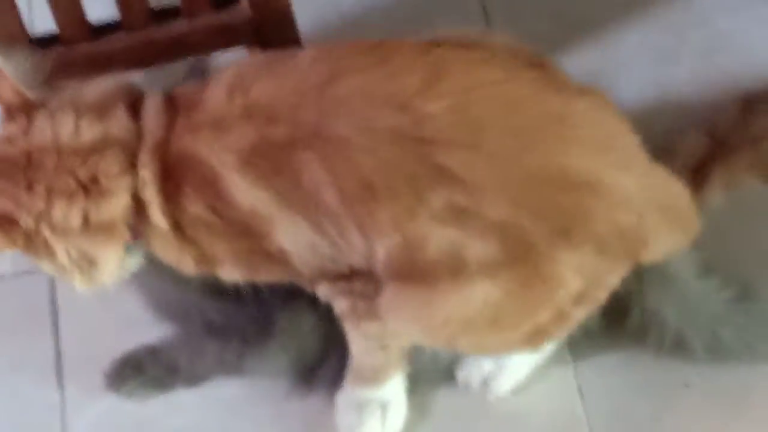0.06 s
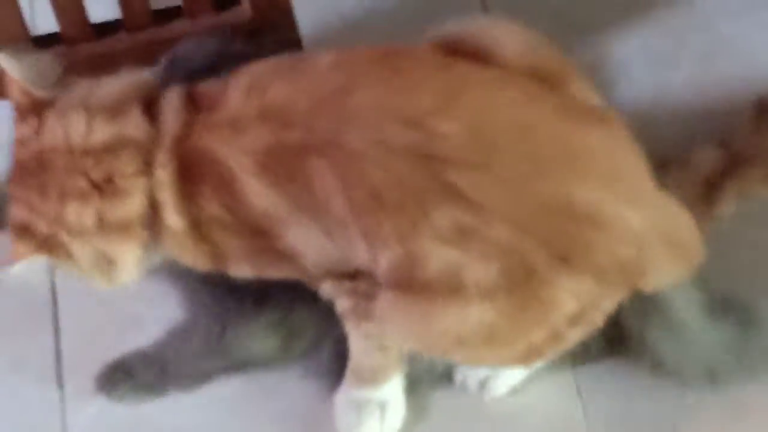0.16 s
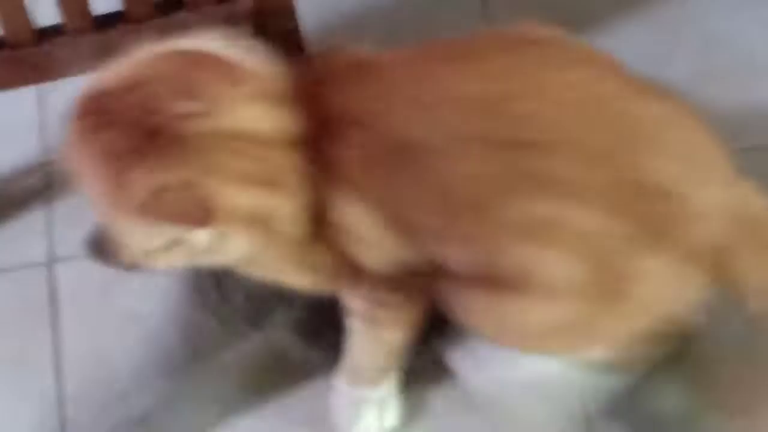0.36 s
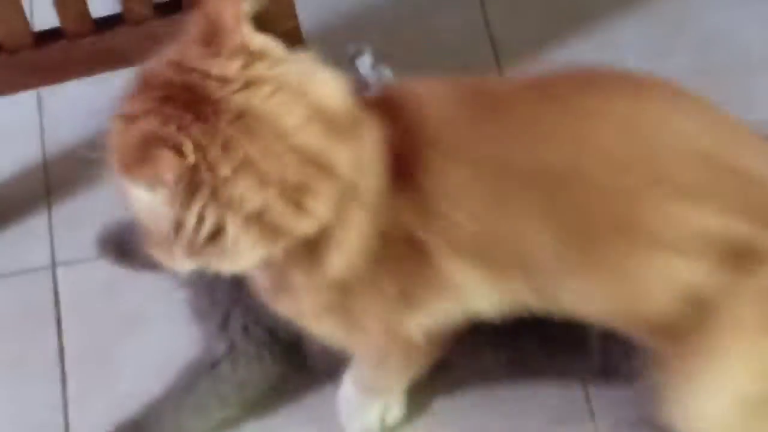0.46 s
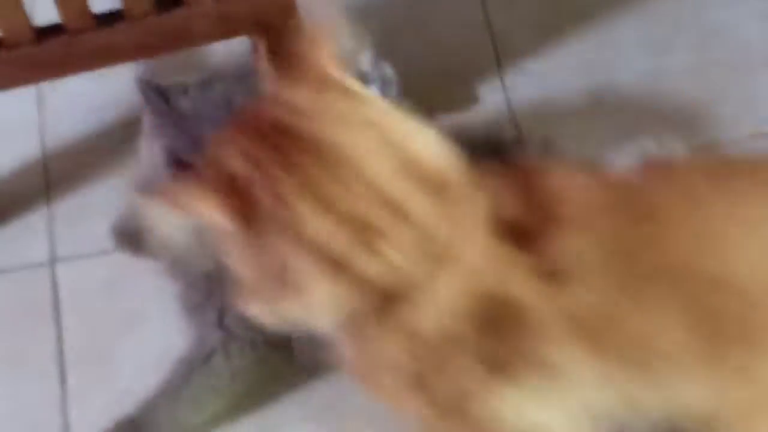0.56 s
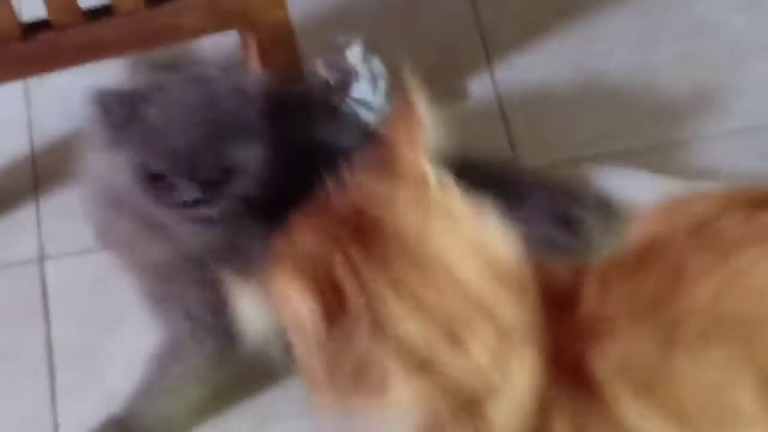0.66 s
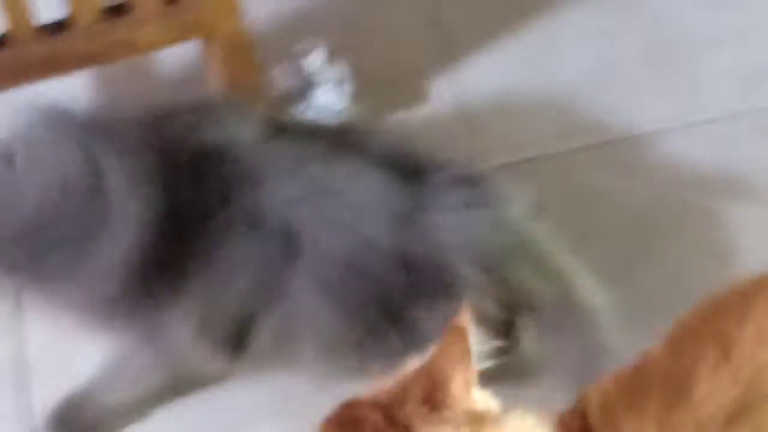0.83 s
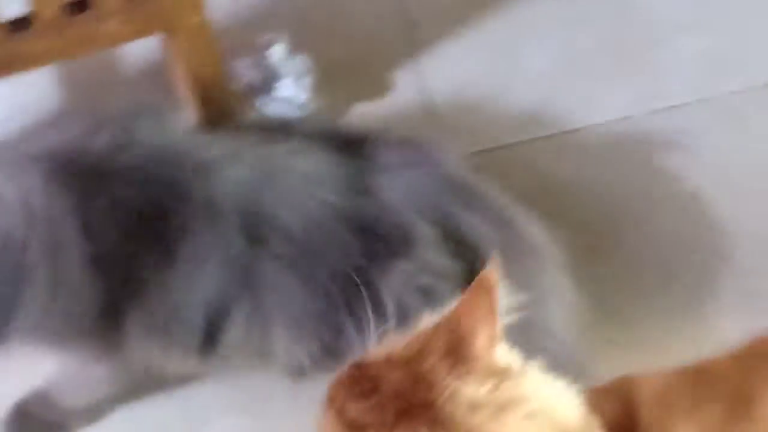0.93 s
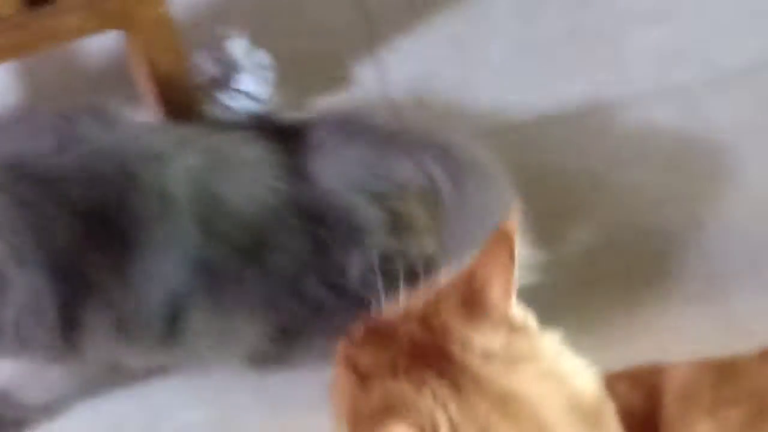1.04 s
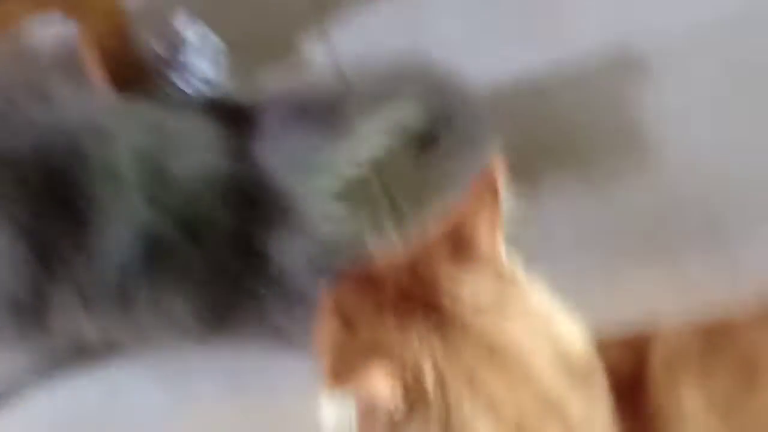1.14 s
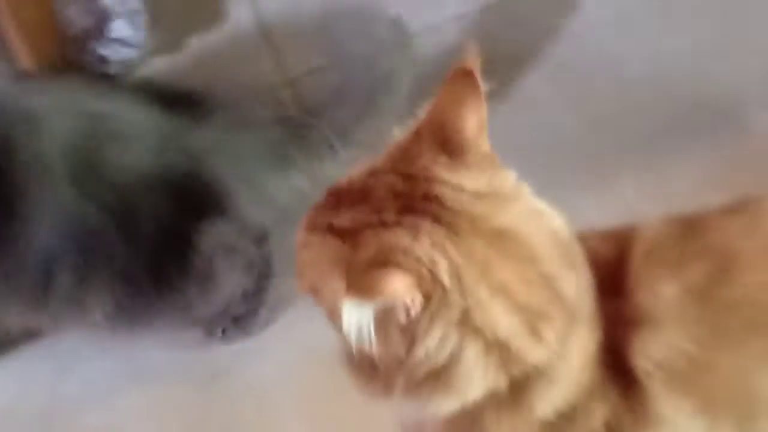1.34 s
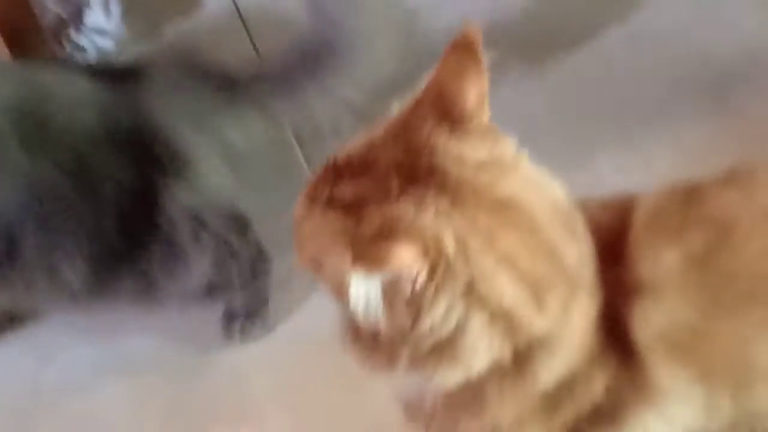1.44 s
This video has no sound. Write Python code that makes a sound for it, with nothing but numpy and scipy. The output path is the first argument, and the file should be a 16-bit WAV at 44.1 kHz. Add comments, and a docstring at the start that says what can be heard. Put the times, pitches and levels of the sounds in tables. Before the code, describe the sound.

A cat yowls close by, its rattling growl rising to a shrill cry, then turning hoarse.

```python
"""A cat yowling in a tiled room

Close by on the right, a rattling growl climbs into a shrill cry and turns hoarse as it falls; a thin
moan holds on and opens into a faint mew. Each call is a train of vocal-fold pulses filtered by the
resonances of a moving mouth. A pellet rings a collar bell, paws tap and scratch on the tiles, and
a soft rustle rises over the hum of the room."""
import sys
import numpy as np
from scipy import signal
from scipy.fft import rfft, irfft
from scipy.io import wavfile

SR = 44100
rng = np.random.default_rng(int(sys.argv[2]) if len(sys.argv) > 2 else 0)


def materialize(psi):
    """Save the field psi as 16-bit PCM at rate SR to the path in sys.argv[1].

    A 1-D psi becomes a single channel; in a 2-D psi each row is a channel.
    """
    bounded = np.clip(np.atleast_2d(psi).T, -1, 1)
    quanta = np.round(bounded * 32767).astype(np.int16)
    wavfile.write(sys.argv[1], SR, quanta)


N = 66150
T = np.arange(N) / SR


def amp(db):
    """Amplitude ratio of a level in decibels."""
    return 10 ** (np.asarray(db) / 20)


def unit_rms(x):
    """Normalisation to an rms of 1."""
    return x / np.sqrt(np.mean(x ** 2) + 1e-20)


def curves(table):
    """Linear interpolation of each column of a time table at every sample."""
    times, *columns = np.transpose(table)
    return [np.interp(T, times, column) for column in columns]


def spectrum_at(table, hz, column=1):
    """Interpolation of one column of a spectrum table on a logarithmic frequency axis."""
    table = np.array(table)
    return np.interp(np.log(hz + 1), np.log(table[:, 0] + 1), table[:, column])


def place(mix, start, sound, pan_db):
    """Interaural level difference: adds a sound at start seconds, pan_db stronger on the left."""
    part = mix[:, round(start * SR):][:, :len(sound)]
    part += amp([[pan_db / 2], [-pan_db / 2]]) * sound[:part.shape[1]]


def colour(x, table, column=1, size=4096):
    """Minimum-phase filtering: the phase follows from the log gain by the Hilbert transform."""
    hz = abs(np.fft.fftfreq(size, 1 / SR))
    log_gain = np.log(amp(spectrum_at(table, hz, column)))
    response = np.exp(np.conj(signal.hilbert(log_gain)))
    taps = np.fft.ifft(response).real[:size // 2]
    return signal.fftconvolve(x, taps)[:len(x)]


def resonate(x, hz, width_hz):
    """A damped resonator of unit peak gain whose centre frequency follows hz."""
    carrier = np.exp(2j * np.pi * np.cumsum(hz * np.ones(N)) / SR)
    pole = np.exp(-np.pi * width_hz / SR)
    return 2 * (carrier * signal.lfilter([1 - pole], [1, -pole], x / carrier + 1e-18)).real


def drift(rate_hz):
    """Random modulation: low-pass Gaussian noise of rms 1."""
    low_pass = np.exp(-(np.fft.rfftfreq(N, 1 / SR) / rate_hz) ** 2)
    return unit_rms(irfft(rfft(rng.standard_normal(N)) * low_pass, N))


def stereo_noise(spectrum):
    """Partially coherent noise: the two ears are most alike near 300 Hz."""
    # Each row: frequency in Hz, correlation between left and right.
    coherence = [(50, 0.32), (300, .93), (700, 0.22), (2000, 0.19), (8000, 0.16)]
    hz = np.fft.rfftfreq(N, 1 / SR)
    left, independent = rfft(rng.standard_normal((2, N)))
    alike = spectrum_at(coherence, hz)
    right = alike * left + np.sqrt(1 - alike ** 2) * independent
    return unit_rms(irfft(np.array([left, right]) * amp(spectrum_at(spectrum, hz)), N))


def background():
    """Broadband room noise and a late rustle lie over a hum modulated in frequency and amplitude."""
    # Each row of both: frequency in Hz, relative spectral density in dB.
    air_spectrum = [(25, -14.5), (60, 0.5), (100, -9.5), (160, 0), (300, -2.5), (600, -8), (1500, -16.5),
                    (2600, -9), (4000, -18), (6500, -25.5), (9000, -39.5), (15000, -39)]
    rustle_spectrum = [(60, -21), (220, -5), (450, -6), (700, -16.5), (1080, -4.5), (1550, -21.5),
                       (2500, -7), (3800, -22.5), (5500, -27), (9000, -40), (13500, -24.5), (15500, -27)]
    # Each row: time in seconds, level in dB.
    rustle_level = [(1.3, -69), (1.34, -57.5), (1.39, -51), (1.5, -51)]
    hum_hz = 94 + 2 * drift(2.9)
    hum = unit_rms(np.sin(2 * np.pi * np.cumsum(hum_hz) / SR) * (1 + 0.1 * drift(10)))
    air = amp(-58.5) * stereo_noise(air_spectrum)
    rustle = amp(curves(rustle_level)[0]) * stereo_noise(rustle_spectrum)
    return air + amp(-64) * hum + rustle


def room(x):
    """Reverberation: dense early reflections from floor and furniture, then the tail of a hard room."""
    # Each row: frequency in Hz, time to decay by 60 dB in seconds.
    decay_times = [(150, .4), (420, 0.33), (900, 0.84), (2400, 0.43), (5000, .6), (12000, 0.21)]
    early_db, early_t60_s, tail_db = -9, 0.052, -13
    t = T[:SR]
    late, early = rng.standard_normal((2, 2, SR)) * np.clip((t - 0.002) / 0.004, 0, 1)
    hz, age, bands = signal.stft(late, SR, nperseg=256)
    decay = amp(-60 * age / spectrum_at(decay_times, hz)[:, None])
    tail = signal.istft(bands * decay, SR, nperseg=256)[1][:, :SR]
    early = early * amp(-60 * t / early_t60_s)
    response = amp(early_db) * early / np.linalg.norm(early[0])
    response += amp(tail_db) * tail / np.linalg.norm(tail[0])
    return signal.fftconvolve(x[None], response, axes=1)[:, :N]


def collar_bell():
    """Modal vibration: a pellet ticks against a tiny metal shell and unsettles its decaying ring."""
    # Each row: start in seconds, level in dB.
    strikes = [(.385, -77.5), (0.574, -81), (.7644, -69.5), (.8764, -56), (0.906, -59)]
    # Each row: frequency in Hz, relative level in dB, time to decay by 60 dB in seconds.
    modes = [(4350, -11, .9), (5320, -19, .25), (10450, -20, .4), (14130, -2, .22), (14380, 0, .2)]
    out, t = np.zeros((2, N)), T[:SR // 2]
    for start, level_db in strikes:
        ring = np.zeros(len(t))
        for hz, mode_db, t60 in modes:
            mode = amp(mode_db - 60 * t / t60) * np.sin(2 * np.pi * (hz * t + rng.random()))
            flutter = 1 + 0.5 * drift(140)[:len(t)]
            ring += mode * flutter
        tick = amp(-8) * rng.standard_normal(len(t)) * np.exp(-t / 0.012)
        place(out, start, amp(level_db) * (ring + tick), pan_db=11)
    return out


def paws():
    """Impact and friction on tile: a tap is a click and a damped thud, a scratch a gritty noise burst."""
    # Each row: start in seconds, click in dB, thud in dB, thud frequency in Hz, left minus right in dB.
    taps = [(0.9962, -39, -52.5, 529, -17), (1.1877, -34, -46, 158, -15.5), (1.242, -49, -58.5, 431, -28)]
    # Each row: start in seconds, peak level in dB, left minus right in dB.
    scratches = [(1.2775, -48, -24.5), (1.2855, -48, -28.5), (1.3025, -51.5, -26), (1.3488, -45, -24),
                 (1.3555, -45.5, -23), (1.3840, -55, -15)]
    # Each row of both: frequency in Hz, relative gain in dB.
    click_spectrum = [(100, -6.5), (900, -5.5), (2500, -10.5), (3800, -10), (5000, -22), (8000, -22.5),
                      (14000, -31)]
    scratch_spectrum = [(200, -3.5), (1400, -10.5), (2800, 6), (4000, -5.5), (5500, -31), (9000, -35),
                        (15000, -32)]
    click_s, thud_s, scratch_s = 0.00033, 0.0022, 0.0042  # time constants of decay
    out, t = np.zeros((2, N)), T[:2048]
    for start, click_db, thud_db, thud_hz, pan_db in taps:
        click = colour(np.exp(-t / click_s) * np.cos(2 * np.pi * 2500 * t), click_spectrum)
        thud = np.sin(2 * np.pi * thud_hz * t) * t / thud_s * np.exp(1 - t / thud_s)
        place(out, start, amp(click_db) * click / abs(click).max() + amp(thud_db) * thud, pan_db)
    for start, level_db, pan_db in scratches:
        scratch = colour(rng.laplace(size=len(t)) * np.exp(-t / scratch_s), scratch_spectrum)
        place(out, start, amp(level_db) * scratch / abs(scratch).max(), pan_db)
    return out


def rasp():
    """Aperiodic energy: a low band of noise around the fundamental of the voice."""
    # Each row: frequency in Hz, relative gain in dB.
    spectrum = [(40, -27), (130, -8), (230, -9), (380, -4), (550, -17), (900, -15.5), (2000, -49)]
    # Each row: time in seconds, level in dB.
    level = [(0, -50.5), (.15, -51), (.33, -51), (.43, -65.5), (.5, -65), (.55, -52), (.63, -61.5),
             (.75, -65), (.9, -132)]
    return unit_rms(colour(rng.standard_normal(N), spectrum)) * amp(curves(level)[0])


def vocal_folds(cycles, hz, roughness, halving):
    """Glottal source: uneven pulses with puffs of breath; weakening every second adds a subharmonic."""
    onsets = np.flatnonzero(np.diff(np.floor(cycles)))
    jitter, shimmer, breath = 0.075 * roughness[onsets], 0.37 * roughness[onsets], 0.6 * roughness
    timing, strength = rng.standard_normal((1000, 2))[:len(onsets)].T
    period = SR / hz[onsets]
    position = np.clip(onsets + jitter * timing * period, 0, N - 2)
    height = np.exp(shimmer * (strength - shimmer))
    height *= 1 - halving[onsets] * (np.arange(len(onsets)) % 2)
    height *= np.sqrt(2 * period / (1 + (1 - halving[onsets]) ** 2))  # keeps the mean power steady
    sample, fraction = position.astype(int), position % 1
    pulses = np.bincount(sample, height * (1 - fraction), N)
    pulses += np.bincount(sample + 1, height * fraction, N)
    puff_s = 0.0024
    puff_envelope = signal.lfilter([1], [1, -np.exp(-1 / (puff_s * SR))], pulses)
    puffs = unit_rms(rng.standard_normal(N) * puff_envelope)
    return (pulses + breath * puffs) / np.hypot(1, breath)


def vocal_tract(source):
    """Formant filtering: three moving and two stationary resonances, then the colour of the throat."""
    # Each row: time in seconds, lower, upper and top formant in Hz, throaty, bright and top gain in dB.
    mouth = [(0, 1216, 2836, 4600, 0, -24, 3.6), (.085, 1333, 2630, 4850, 5.5, -20, 4.8),
             (.14, 1652, 2850, 4770, 10, -30.5, 5.4), (.205, 2050, 3024, 4690, 18.5, -24, 24),
             (.26, 2283, 2737, 4180, 19, -35, 10), (.37, 2323, 2725, 4550, 12, -35, 1.5),
             (.44, 2430, 2635, 5040, -26.5, 3.5, 2), (.55, 2390, 2560, 5180, -26.5, 31.5, 26),
             (.66, 2080, 2330, 6100, 12, 0.5, 16), (.80, 1640, 2380, 5734, -18, -0.5, 41),
             (.87, 1760, 2427, 5550, -11.5, 27.5, 23.9)]
    # Each row: time in seconds, gain in dB of the upper formant, which makes the cry piercing.
    upper_gain = [(0, 15.5), (.14, 7.5), (.26, 17), (.32, 9.5), (.37, 19), (.46, 17.5), (.49, 15),
                  (.56, 22), (.66, 1.5), (.85, 8)]
    # Each row: frequency in Hz, relative gain in dB.
    throat = [(100, -50.5), (600, -36.5), (850, -24.5), (1150, -13), (1750, -8.5), (2150, -2.5),
              (2700, 4.5), (3000, 1.5), (3400, -8.5), (4000, -17), (5000, -25.5), (6200, -41), (7500, -55),
              (15000, -61)]
    lower_hz, upper_hz, top_hz, throaty_db, bright_db, top_db = curves(mouth)
    # Each row: centre in Hz, bandwidth in Hz, gain in dB.
    formants = [(1164, 600, throaty_db), (lower_hz, 184, 18), (upper_hz, 222, curves(upper_gain)[0]),
                (3378, 313, bright_db), (top_hz, 530, top_db)]
    ringing = sum(amp(db) * resonate(source, hz, width_hz) for hz, width_hz, db in formants)
    return unit_rms(colour(source + ringing, throat))


def call(contour):
    """Source and filter: the folds drive the tract. Returns the cry and its two clean low partials."""
    hz, cry_db, roughness, halving, low_db = curves(contour)
    roughness, halving = np.clip([roughness, halving], 0, 1)
    waver = 0.02 * (roughness + 0.53) * drift(70)
    cycles = np.cumsum(hz * (1 + waver)) / SR
    cry = vocal_tract(vocal_folds(cycles, hz, roughness, halving)) * amp(cry_db)
    octave = amp(1) * (1 - roughness) * np.sin(4 * np.pi * cycles)
    low = unit_rms(np.sin(2 * np.pi * cycles) + octave) * amp(low_db)
    start, end = contour[0][0], contour[-1][0]
    gate = np.clip(np.minimum(T - start, end - T) / 0.004, 0, 1)
    return np.array([cry, low]) * gate


def cat():
    """Direct and reflected sound: the calls, shaded toward the right ear, over a low rasp."""
    # Each row of both: time in seconds, pitch in Hz, relative cry level in dB, roughness (full at 1),
    # weakening of every second pulse from 0 to 1, relative level of the low partials in dB.
    yowl_contour = [(0, 199.7, -39, 0.96, 0.95, -51.5), (.085, 220.2, -37.5, 0.95, 0.5, -45),
                    (.13, 250.9, -28, 0.56, 0.1, -52), (.195, 275.2, -28, 0.48, 0, -54.5),
                    (.24, 281.2, -18.5, 0.53, 0.5, -53.5), (.305, 322.1, -21, 0.23, 0.2, -58.5),
                    (.345, 375.5, -16, 0.37, 0, -48.5), (.385, 421.2, -12.5, 0, 0.4, -51),
                    (.42, 446, -12.5, .06, 0, -47.5), (.46, 454.6, -12.5, .06, .04, -47.5),
                    (.478, 421.5, -14.5, .18, 0, -51), (.515, 428.1, -19.5, 0.1, 0.1, -54),
                    (.548, 444.8, -22.5, .3, 0, -42.5), (.585, 407.7, -21, .4, 0, -50),
                    (.62, 368.3, -20.5, .5, 0.1, -82), (.67, 321.7, -26, 0.9, 0, -54),
                    (.71, 288.1, -37.5, 1.1, .8, -78), (.76, 285.5, -52, 0, .8, -102)]
    mew_contour = [(.57, 424.3, -73, 0.033, 0, -58.5), (.66, 411.5, -70.5, .1, 0.019, -53.5),
                   (.73, 406, -61.5, 0.23, 0, -58), (.79, 395.1, -61, 0.11, 0, -62),
                   (.83, 390, -43, .1, .05, -65), (.865, 432.6, -44, 0.12, .05, -55),
                   (.895, 431.1, -51, 0.66, 0.15, -69), (.95, 390, -50.5, .6, .3, -58.5)]
    # Each row: frequency in Hz, gain at the left ear in dB, gain at the right ear in dB.
    ear_gains = [(200, -0.5, -3.5), (600, 1, 7.5), (1288, -12.5, -0.5), (2197, -7, 5.5), (2570, -13.5, 2),
                 (3566, -16.5, -2.5), (4450, -7.5, -2), (5360, -1, -5.5), (9200, -2, 2)]
    yowl, yowl_low = call(yowl_contour)
    mew, mew_low = call(mew_contour)
    distant_mew = mew + amp(6.5) * room(mew)[0]  # farther off, so more comes by way of the room
    cry, low = yowl + amp(-3.5) * distant_mew, yowl_low + mew_low
    left, right = cry + room(cry) * amp([[12.5], [0]])  # the far ear hears more of the room
    left, right = colour(left, ear_gains, column=1), colour(right, ear_gains, column=2)
    right_lag_s = 0.00003
    shaded = np.array([left, np.interp(T - right_lag_s, T, right)])
    return shaded + rasp() + low + amp(0.5) * room(low)


def scene():
    """Superposition of the cat, its paws and bell with their faint reflections, and the background."""
    movement = paws() + collar_bell()
    return cat() + movement + amp(-19) * room(movement.mean(0)) + background()


def record(dry):
    """Band limiting: a linear-phase low-pass filter cuts the treble above 15.6 kHz."""
    low_pass = signal.firwin(511, 15600, window=("kaiser", 9), fs=SR)
    return signal.oaconvolve(dry, low_pass[None], "same")


dry = scene()
out = record(dry)
materialize(out)
```